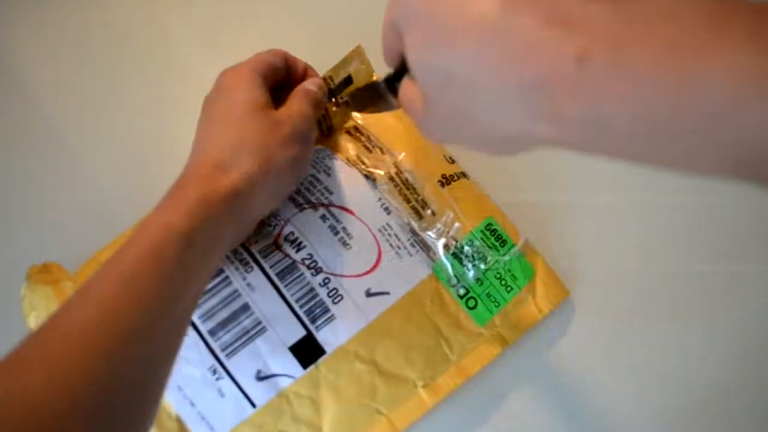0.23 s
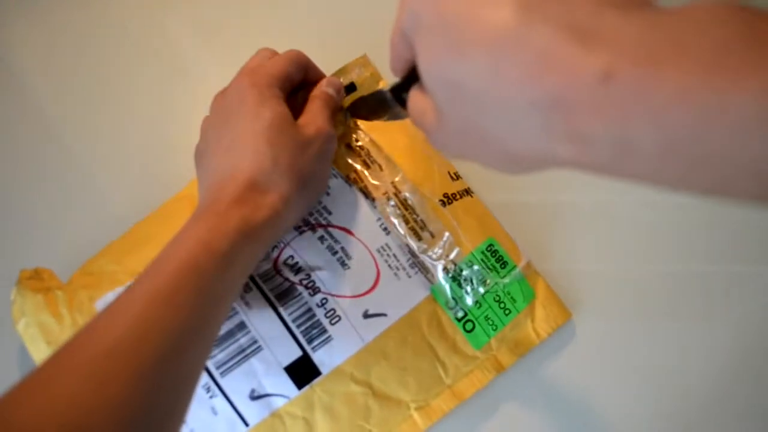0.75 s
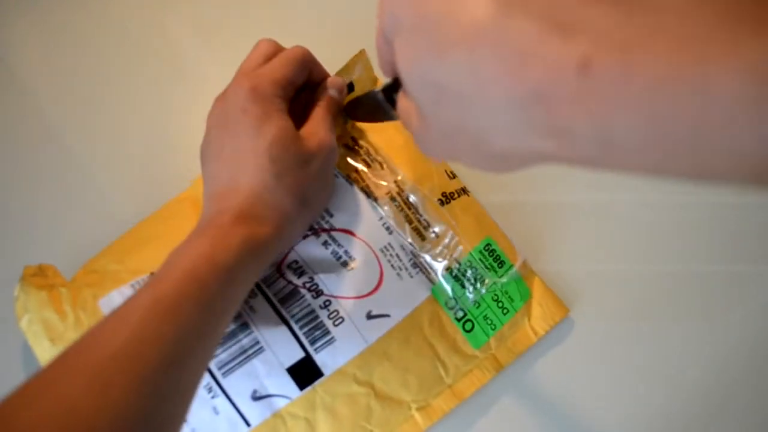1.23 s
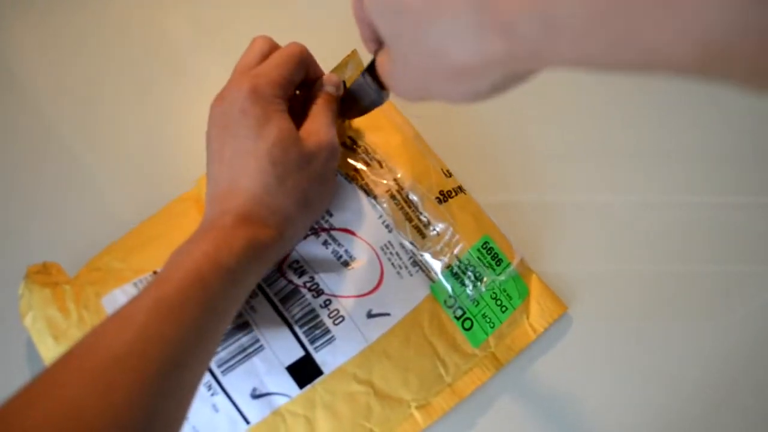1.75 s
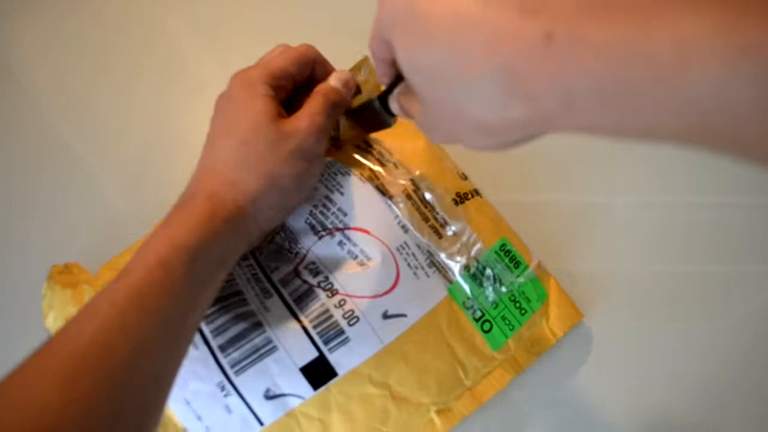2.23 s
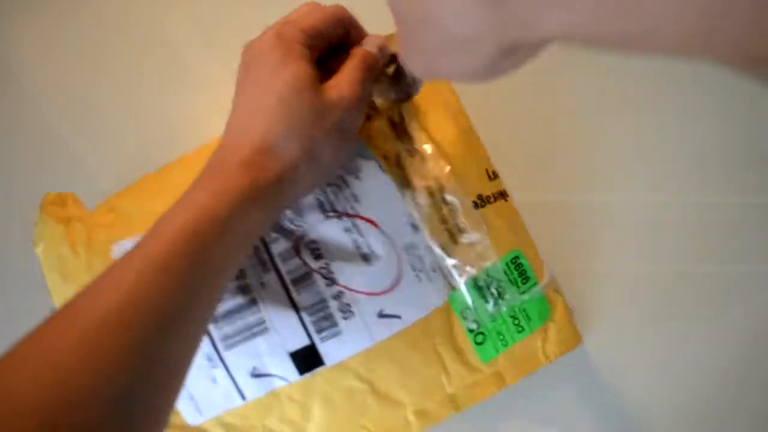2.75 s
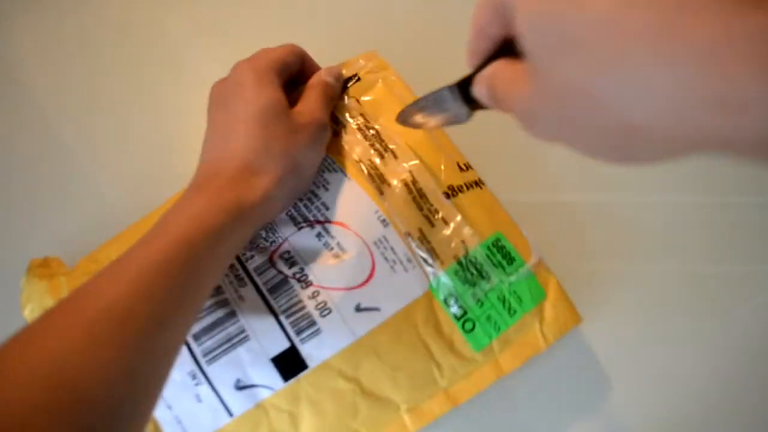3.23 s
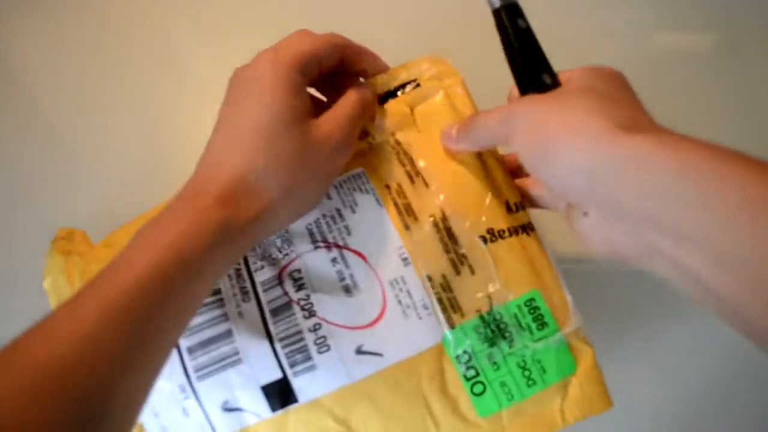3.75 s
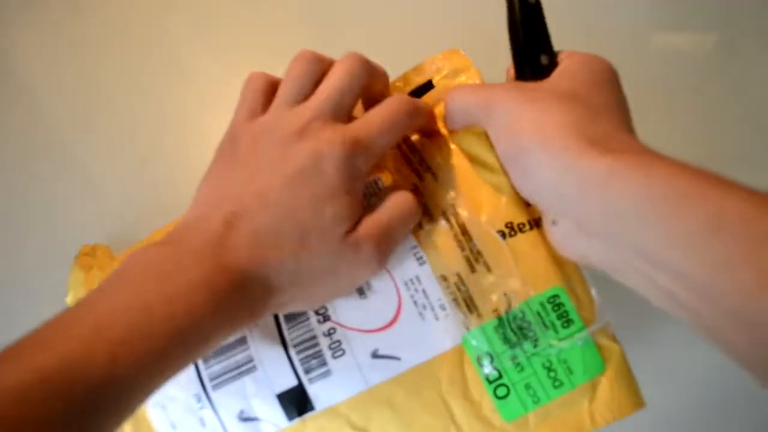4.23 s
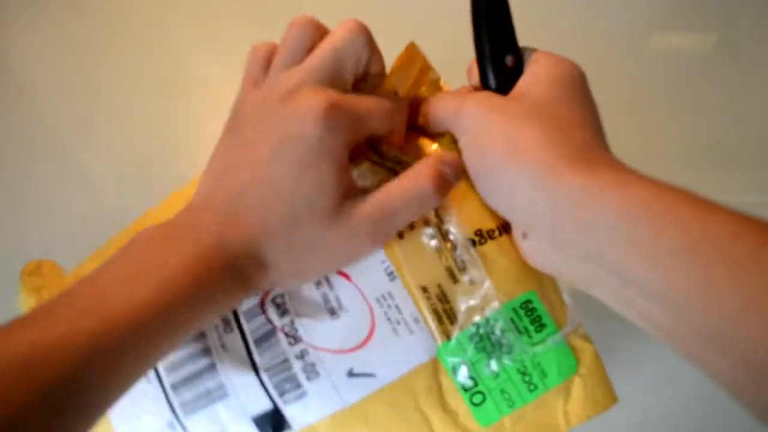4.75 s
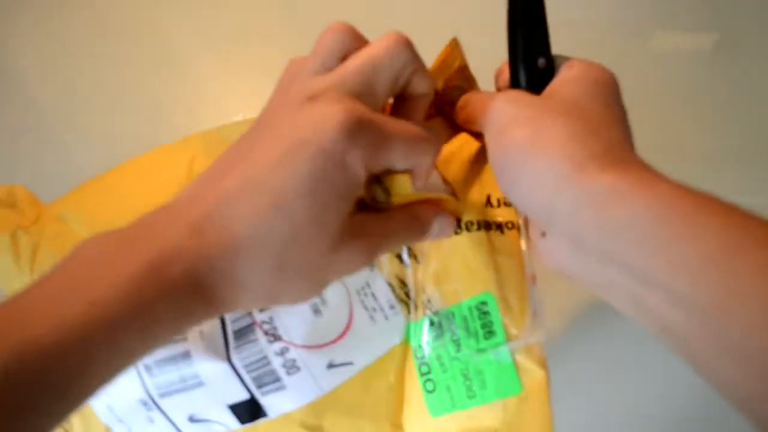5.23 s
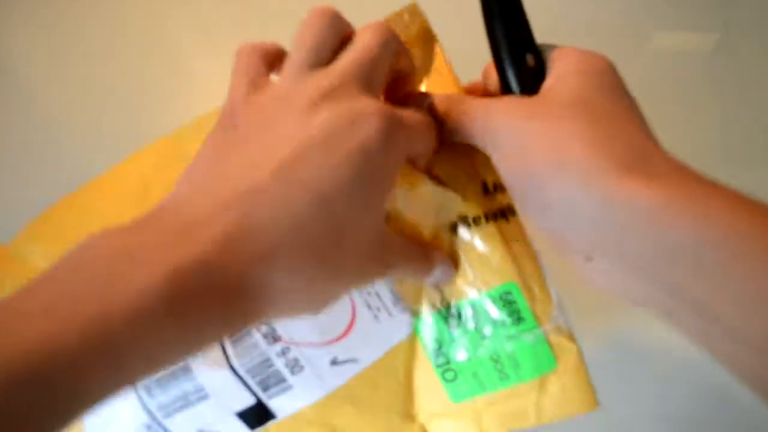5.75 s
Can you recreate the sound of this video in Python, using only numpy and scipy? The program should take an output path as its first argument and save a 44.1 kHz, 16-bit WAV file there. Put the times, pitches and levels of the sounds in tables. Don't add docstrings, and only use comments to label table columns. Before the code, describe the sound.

Irregular crisp creases snap over thin, grainy crinkle as a mailer is cut and pulled open. It begins with a brief flurry, falls to near quiet, picks up with isolated cracks and soft padded flaps, then builds to thick crackling with two strong peaks and low hollow knocks. Mono, close microphone, slightly dull top end, small room with little reverberation and a low noise floor.

```python
import sys
import numpy as np
from scipy import signal
from scipy.fft import rfft, irfft
from scipy.io import wavfile
from scipy.ndimage import uniform_filter1d

SR = 44100
rng = np.random.default_rng(int(sys.argv[2]) if len(sys.argv) > 2 else 0)


def materialize(psi):
    bounded = np.clip(np.atleast_2d(psi).T, -1, 1)
    quanta = np.round(bounded * 32767).astype(np.int16)
    wavfile.write(sys.argv[1], SR, quanta)


def voltage_ratio(level):
    return 10 ** (np.asarray(level, float) / 20)


N = 264203


def evened(x):
    return x / np.sqrt(np.mean(x ** 2) + 1e-20)


def read(points, hz):
    f, value = np.transpose(points)
    return np.interp(np.log(hz + 1), np.log(f + 1), value)


def add(mix, s, sound):
    part = mix[round(s * SR):][:len(sound)]
    part += sound[:len(part)]


def causal(gain_db):
    log_gain = np.log(voltage_ratio(np.maximum(gain_db, -100)))
    whole = np.concatenate([log_gain, log_gain[-2:0:-1]])
    return np.exp(log_gain - 1j * signal.hilbert(whole).imag[:len(log_gain)])


def rattle(chance, fade_s):
    t = np.arange(chance.shape[1]) / SR
    lumps = voltage_ratio(2.5 * evened(uniform_filter1d(chance[1], 30)))
    gap = 1 - np.exp(-(t / 0.0015) ** 2)
    return chance[0] * lumps * np.exp(-t / fade_s) * gap


def snap(ring_hz, paper_db, tick_share, luck):
    hz = np.fft.rfftfreq(4096, 1 / SR)
    octaves = np.log2(ring_hz / 3000)
    film_db = 4.5 + 4.5 * octaves
    rattle_db = -9 - octaves
    colour_db = read([(100, paper_db - 62), (500, paper_db - 22.5), (1500, paper_db), (3700, 0.008),
                      (7500, film_db), (20000, film_db - 4)], hz)
    ring = 1 / (1 + ((hz - ring_hz) / (0.13 * ring_hz)) ** 2)

    tick_db = colour_db + 11 * ring - 5 * np.log2(1 + (hz / (3 * ring_hz)) ** 2)
    tick = irfft(causal(tick_db))[:2048]
    tick *= 1 - np.exp(-5 * ring_hz * np.arange(1, 2049) / SR)

    dull = causal(colour_db + 5.3 * ring - 8 * np.log2(hz / 1000 + 1))
    shaking = rattle(luck, 0.0043 * voltage_ratio(-1.2 * octaves))
    after = irfft(rfft(shaking, 4096) * dull)[:2048] / np.linalg.norm(irfft(dull))
    return tick_share * tick / abs(tick).max() + voltage_ratio(rattle_db) * after


CLEAR_SNAPS = [(0.032, -34.5, 1500, -6), (0.2597, -23.5, 2540, -8.5), (0.299, -31, 4200, -9),
               (0.354, -37, 1840, -6), (0.483, -12, 5070, -5), (0.4857, -7, 5800, 3),
               (0.5083, -19, 5700, -14), (0.5133, -8, 5400, 8.5), (0.5546, -10, 4350, 6.5),
               (0.558, -7, 3800, -1), (0.592, -16.5, 6160, 6), (0.685, -20, 8500, -9),
               (.7111, -27, 5400, -12), (0.7951, -37, 3000, 5), (.887, -22.5, 2820, 14),
               (0.9675, -28, 4050, 4), (1.0064, -31, 2200, -5), (1.0219, -29, 1350, -1),
               (1.0437, -21, 1350, -4.5), (1.0932, -30.5, 1250, -11), (1.2268, -29.5, 3060, 1.5),
               (1.2396, -36, 6360, -6), (1.3763, -34, 1940, -10), (1.502, -37, 6000, -4),
               (1.514, -29.5, 3970, -23), (1.5837, -28, 6060, -13), (1.606, -35, 4110, -13),
               (1.773, -39, 1170, -1), (1.9046, -34, 3180, 1),
               (2.0386, -35, 4000, 12), (2.1034, -21, 4230, -4), (2.2605, -8.5, 7560, -1),
                (2.438, -23, 5800, 4), (2.4453, -30.5, 1160, 4), (2.493, -26, 1540, -5),
                (2.506, -23.5, 9400, -19), (2.6065, -7.5, 4100, -19), (2.6116, -16, 1500, -11),
                (2.6078, -7, 6000, 10), (2.6702, -28, 1600, -10), (2.776, -36, 1750, -5),
                (2.898, -19, 5900, 8), (2.9321, -14, 1910, -7), (3.1913, -23, 1050, 16),
                (3.247, -14, 5700, -19), (3.4233, -19, 6060, 4), (3.47, -27, 5250, 3),
                (3.4755, -23.5, 5630, 2), (3.4845, -27, 6000, 6), (3.5117, -18, 1340, -6),
                (3.5494, -19.5, 5170, -7), (3.5762, -15.5, 5340, -3), (3.6655, -27.5, 4500, 9),
                (3.6917, -33.5, 3900, 9),
               (3.7687, -30, 1450, 8), (3.7887, -33.5, 1060, 14), (3.9298, -19.5, 2400, -8),
                 (3.9354, -18, 4120, 1), (3.967, -29, 1000, -1), (3.989, -24.5, 2910, -30),
                 (3.996, -24.5, 1990, -11), (4.014, -23, 4100, -28), (4.033, -25, 3000, -10),
                 (4.029, -20, 4670, -15), (4.04, -25.5, 2800, -4), (4.0905, -25.5, 3520, -9),
                 (4.1234, -26.5, 4300, 5), (4.1476, -32, 830, 20), (4.292, -16.5, 5130, -4),
                 (4.37, -19.5, 6700, 2), (4.3919, -6.5, 3100, -7), (4.437, -18, 7000, -18),
                 (4.4406, -11.5, 5800, 3), (4.513, -25, 6460, -5), (4.516, -18, 1490, -3),
                 (4.5484, -9.5, 9600, 2), (4.5953, -23.5, 1490, 6), (4.65, -15, 1920, -5),
                 (4.6659, -7, 1500, -5), (4.6858, -19, 3700, -9), (4.7049, -13.5, 7000, 10),
                 (4.7192, -19, 6060, 13), (4.7354, -12, 2730, 7), (4.7451, 1.5, 3860, -3),
                 (4.756, -8, 3740, -1), (4.7734, -18.5, 3080, -1),
               (4.917, -16, 3770, -6), (4.969, -20, 1370, 17), (4.9841, -18.5, 880, 18),
                 (5.007, -19, 3160, -18), (5.1244, -27.5, 1510, -2), (5.1496, -20.5, 1340, 2),
                 (5.1591, -23, 1620, 0.5), (5.184, -17, 6140, 12), (5.1965, 2.5, 4450, -0.5),
                 (5.216, -27, 5120, -4), (5.224, -18, 1800, 1), (5.295, -12.5, 5210, 9),
                 (5.319, -6.5, 1870, -4.5), (5.3567, -8.5, 1320, -3.5), (5.3629, -7.5, 4300, 4),
                 (5.3726, -3, 5700, 5.5), (5.38, -8.5, 7500, 4), (5.3906, -12.5, 1020, -2),
                 (5.4885, -23.5, 1350, 27), (5.5506, -16.5, 5100, 5), (5.6089, -19, 4460, 4),
                 (5.72, -32, 2740, 21), (5.8073, -34, 1760, 2), (5.8486, -11.5, 1440, 0),
                 (5.884, -29, 1330, 2), (5.9186, -9, 1200, 2.5), (5.9443, -14.5, 8400, 10)]
# (time [s], peak level [dB],
# tick pitch [Hz], paper share [dB])
LONE_TICKS = [(0.206, -35, 3790, -7), (0.1105, -35, 5000, -8), (0.3055, -35.5, 2260, -2),
              (0.0005, -32.5, 3500, 5), (0.506, -25, 5700, 0), (0.7545, -36, 5500, -3),
              (0.8304, -33, 2280, -19), (0.903, -39, 5640, 5), (0.9533, -38, 4180, -5),
              (1.0436, -37, 1400, -12), (1.0593, -32, 4470, -2), (1.159, -42, 4130, -4),
              (1.1764, -42, 2410, -10), (1.1854, -38, 5600, -1), (1.196, -38, 4260, -4),
              (1.2061, -43, 3160, 0), (1.5066, -40, 4350, -9), (1.5526, -52, 3320, -4),
              (1.5766, -46, 3830, -1), (1.5987, -39, 4220, -8),
              (1.896, -42, 4220, -7), (1.918, -46, 1110, 5), (2.056, -30.5, 2370, -22),
              (2.0972, -28, 9150, -10), (2.1926, -42, 780, 0), (2.214, -43, 2930, 6),
              (2.2516, -49, 2540, 11), (2.481, -37, 4250, -9), (2.807, -42, 4010, 4.5),
              (2.875, -40.5, 945, -2), (2.8912, -32, 4480, 10), (3.2442, -26, 5470, 6),
              (3.427, -43, 1400, 12), (3.7398, -53, 4440, -4), (4.1312, -34.5, 1240, 3),
              (4.162, -33, 5810, 0), (4.322, -30, 1360, -7), (4.525, -26, 1470, -3),
              (4.5874, -40, 5120, -1), (4.893, -35, 4480, -4), (4.907, -32, 1520, -1),
              (5.1433, -29, 4200, -4), (5.522, -31, 7500, 3), (5.542, -41, 1310, 1),
              (5.977, -29, 2020, -13),
              (0.284, -34, 3680, -4), (0.3698, -37, 1850, -11), (0.5795, -20.5, 4100, 0),
               (0.784, -39.5, 1190, 8), (0.941, -35, 4090, -6), (1.026, -31, 720, 4),
               (1.3157, -33.5, 4230, 3), (1.6313, -42, 3190, -23), (1.8353, -52, 2160, -1),
               (2.231, -57, 950, 6), (2.2727, -21.5, 3040, 0), (2.3126, -16, 1460, -5.5),
               (2.401, -38, 4350, -6), (2.4576, -40, 2970, 11), (2.574, -41, 3270, -5),
               (2.658, -36, 1330, -4), (2.916, -25, 4120, -4), (3.04, -39, 2540, 4), (3.505, -38, 1400, 18),
               (3.8117, -39.5, 1120, 15), (3.949, -28, 2840, -5), (3.98, -33, 1760, -6),
               (4.4854, -37, 1250, 3), (4.635, -25.5, 8870, 0), (4.7146, -17.5, 1500, -10),
               (4.7227, -24, 1500, -2.5), (4.9512, -37, 1080, -3), (5.0255, -25.5, 2020, -19),
               (5.3127, -19, 1100, 3), (5.357, -9.5, 6450, 0), (5.3846, -21, 1740, 2),
               (5.4649, -34, 870, 22), (5.4814, -25.5, 1350, 2), (5.4945, -32, 1630, 13),
               (5.741, -37, 7000, -5), (5.7516, -44, 3060, -3), (5.772, -37, 1100, 3),
               (5.824, -40, 1380, 7), (5.936, -33, 1210, 4)]
SCRUNCHES = [(0.46, -22, 6330, 0), (0.667, -11.5, 8600, -21), (0.684, -14, 2730, -7.5),
             (1.317, -24.5, 4200, -1), (1.4438, -20.5, 1830, 3.5), (1.637, -15.5, 2760, -3.5),
             (1.649, -37, 2750, -7), (0.545, -17, 1290, 8), (.653, -29, 1300, 14), (4.458, -15, 9400, -5),
             (3.2, -17, 5500, -3), (2.58, -19, 5850, -2), (2.594, -16, 7300, -9), (2.9135, -16.5, 1590, 0),
             (2.97, -12, 9200, -6), (3.18, -23, 4480, -4), (3.216, -10.5, 9500, -8), (5.483, -30, 1470, 16)]


def snaps():
    clear = CLEAR_SNAPS
    lone = LONE_TICKS
    out = np.zeros(N)
    for creases, tick_share in [(clear, 1.3), (lone, 2.0), (SCRUNCHES, 0.07)]:
        for s, peak_db, ring_hz, paper_db in creases:
            luck = rng.standard_normal((2, 2048))
            add(out, s, voltage_ratio(peak_db) * snap(ring_hz, paper_db, tick_share, luck))
    return signal.sosfilt(signal.butter(3, 330, "highpass", fs=SR, output="sos"), out)


# (time [s], crinkle level [dB], film brightness [dB])
GRIP = [(0, -46.5, -4), (.2, -46, -3), (.44, -54, -4.5), (.75, -49, 2), (1.261, -53.5, -4),
        (1.34, -47.5, 3.5), (1.8, -57.5, -4), (2.11, -45, -1.5), (2.501, -47, -7.5), (2.85, -53, -6),
        (3.4, -47, -10), (3.59, -47.5, -2.5), (3.75, -56.5, -28), (3.8, -54.5, -4), (4.35, -45.5, 0.5),
        (4.6, -39.5, -5), (4.87, -47, 0), (5.99, -40.5, -4)]
# (start [s], hold
# [s], crinkle level [dB], film brightness [dB])
STROKES = [(0, 0.0021, -37.5, -2.5), (0.489, 0.055, -38.5, 0), (0.547, 0.021, -38.5, -7),
           (0.658, 0.016, -39.5, -2.5), (0.843, 0.075, -44.5, -2), (1.028, 0.026, -45, -9),
           (1.644, 0.015, -51, -6), (2.071, 0.065, -45, -5.5), (2.274, 0.04, -24, -3.5),
           (2.602, 0.038, -37, 1.5), (2.904, 0.098, -40, -1), (2.995, 0.11, -45.5, -9),
           (3.202, 0.023, -37, 0), (3.288, 0.025, -31, -0.5), (3.941, 0.11, -47.5, 9),
           (4.043, 0.016, -39, -5), (4.218, 0.0097, -38, -4.5), (4.115, 0.065, -40, -2),
           (4.366, 0.036, -44.5, 4), (4.44, 0.0043, -32.5, -2.5), (4.511, 0.056, -35.5, -4.5),
           (4.692, 0.037, -32.5, 3.5), (4.974, 0.013, -31.5, -1.5), (5.086, 0.095, -38, -11),
           (5.199, 0.01, -28.5, 12), (5.296, 0.069, -25.5, -4), (5.487, 0.0055, -31.5, -5.5),
           (5.524, 0.011, -31, -4.5), (5.63, 0.02, -34, -8.5), (5.807, 0.09, -37.5, -5),
           (5.921, 0.033, -35, 1.5),
           (0.172, 0.023, -45, -2.5), (1.295, 0.054, -54, 2), (1.951, 0.031, -53, 7),
                 (2.492, 0.015, -47.5, 1), (2.327, 0.018, -33, -15), (2.662, 0.062, -48.5, -0.5),
                 (3.142, 0.052, -45, 8), (3.269, 0.01, -39.5, -8), (3.308, 0.0081, -38, -21),
                 (2.874, 0.026, -46, 1), (1.868, 0.028, -53.5, -3), (3.463, 0.036, -46.5, 8),
                 (3.783, 0.01, -47.5, 7), (3.834, 0.019, -38, -9), (3.886, 0.027, -39.5, -11),
                 (0.578, 0.011, -38, 6), (4.615, 0.048, -37, -6), (4.785, 0.033, -39.5, 0),
                 (5.02, 0.035, -41.5, -9), (5.24, 0.049, -30, -0.5), (5.407, 0.027, -50, -20),
                 (5.715, .03, -44, -10)]


def handling(t):
    rise_db_per_s, fall_db_per_s = 603, 226
    s, grip_db, grip_film_db = np.transpose(GRIP)
    power = voltage_ratio(2 * np.interp(t, s, grip_db))
    bright = power * np.interp(t, s, grip_film_db)
    for start, hold, stroke_db, film_db in STROKES:
        rise_db = rise_db_per_s * np.maximum(start - t, 0)
        fall_db = fall_db_per_s * np.maximum(t - start - hold, 0)
        stroke = voltage_ratio(2 * (stroke_db - rise_db - fall_db))
        power = power + stroke
        bright = bright + stroke * film_db
    return 10 * np.log10(power), bright / power


def steadied(x, size):
    return x / np.sqrt(abs(uniform_filter1d(x ** 2, size)) + 1e-12)


# (frequency [Hz], density [dB per Hz])
SHEET_COLOUR = [(59, -63), (100, -21.5), (555, -1), (758, -1), (1590, 3), (2250, 1), (4460, -5),
                (11300, -10), (13600, -134), (22000, -120)]


def crinkle():
    t, hz = np.arange(N) / SR, np.fft.rfftfreq(2048, 1 / SR)
    effort_db, film_db = (np.interp(t, t[::64], curve) for curve in handling(t[::64]))

    clumps = voltage_ratio(5 * evened(uniform_filter1d(rng.standard_normal(N), 300)))
    per_second = 1500 * voltage_ratio(0.6 * (effort_db + 50)) * clumps
    spread_db = 3.7 - 0.03 * (effort_db + 50)
    size = voltage_ratio(spread_db * np.minimum(rng.exponential(1, N), 3.2))
    size *= rng.random(N) < per_second / SR

    kind = rng.integers(0, 24, N)
    layers = np.zeros((2, N))
    for k, centre_hz in enumerate(np.geomspace(350, 10500, num=24)):
        patch_db = -11 * np.log2((hz + 1) / centre_hz) ** 2
        drive = voltage_ratio(-13) * rattle(rng.standard_normal((2, 1024)), 0.004) + signal.unit_impulse(1024)
        grain = irfft(rfft(drive, 2048) * causal(read(SHEET_COLOUR, hz) + patch_db))[:1024]
        layers[int(centre_hz > 4200)] += signal.oaconvolve(size * (kind == k), grain)[:N]
    paper, film = steadied(layers[0], size=2600), steadied(layers[1], size=2600)
    return voltage_ratio(effort_db - 5) * (paper + voltage_ratio(film_db + 1) * film)


# (frequency [Hz], width [Hz], level
# [dB])
BODY_RESONANCES = [(666, 22, 5), (880, 46, 2.5), (1500, 25, -4.5), (1960, 100, 3), (3850, 320, 2),
                   (4300, 210, 1.5)]


def body(x):
    hz = np.fft.rfftfreq(N, 1 / SR)
    gain_db = sum(db / (1 + (2 * (hz - f) / width) ** 2) for f, width, db in BODY_RESONANCES)
    return irfft(rfft(x) * voltage_ratio(gain_db), N)


# (time [s], peak level [dB], pitch [Hz])
FLAPS = [(0.182, -37.5, 322), (0.48, -46, 362), (0.555, -56, 328), (2.274, -49, 390), (2.293, -38, 437),
         (2.313, -27, 450), (2.444, -37, 434), (2.604, -26, 400), (3.192, -51, 483), (3.768, -38, 447),
         (3.964, -40, 450), (4.448, -43, 445), (4.501, -47, 473), (4.587, -29, 467), (4.635, -41, 400),
         (4.661, -33, 494), (4.742, -32, 327), (4.97, -29.5, 470), (5.141, -46, 403), (5.195, -18, 554),
         (5.266, -36, 484), (5.311, -23, 445), (5.359, -29, 433), (5.384, -20, 387), (5.486, -26, 366),
         (5.653, -43, 383), (5.761, -30, 454), (5.797, -34.5, 457), (5.846, -31, 456), (5.914, -36, 420)]
KNOCKS = [(.548, -48, 714), (.886, -32, 725), (1.021, -48, 690), (1.445, -30.5, 794), (1.636, -44, 700),
          (2.605, -22, 664), (4.127, -30.5, 690), (4.511, -34, 695), (4.986, -21.5, 563), (5.308, -28, 760),
          (5.392, -21, 850), (5.487, -20.5, 680), (5.544, -24, 643)]


def flaps():
    rise_s, fade_s = 0.0034, 0.0045
    out, t = np.zeros(N), np.arange(3000) / SR
    swell = (1 - np.exp(-t / rise_s)) * np.exp(-t / fade_s) * 2
    for s, peak_db, ring_hz in FLAPS + KNOCKS:
        a, b = rng.random(2)
        ring = np.sin(2 * np.pi * (ring_hz * t + a))
        partner = 0.24 * np.sin(2 * np.pi * (0.613 * ring_hz * t + b))
        add(out, s, voltage_ratio(peak_db - 5.5) * (ring + partner) * swell)
    return out


# (frequency [Hz], level [dB], t60 [s])
BLADE_MODES = [(1250, 0, .04), (2740, 3, .13), (3050, -9, .13), (3700, 2, .05), (3850, -4, .06)]


def blade():
    out, t = np.zeros(N), np.arange(8000) / SR
    waver = 0.7 + 0.65 * evened(uniform_filter1d(rng.standard_normal((len(BLADE_MODES), len(t))), 130))
    ring = np.zeros(len(t))
    for chatter, (f, db, t60) in zip(waver, BLADE_MODES):
        ring += chatter * voltage_ratio(db - 60 * t / t60) * np.sin(2 * np.pi * f * t)
    onset = np.sin(np.pi / 2 * np.minimum(t / 0.003, 1)) ** 2
    add(out, 1.6365, voltage_ratio(-34) * ring * onset)
    return out


def squeak():
    start_s, length_s, pitch_hz, level_db = 3.0, 0.09, 2540, -51
    out, t = np.zeros(N), np.arange(0, length_s, 1 / SR)
    a, b = evened(uniform_filter1d(rng.standard_normal((2, len(t))), 180))
    turn = 2 * np.pi * pitch_hz * t
    swell = np.sin(np.pi * (t / length_s) ** 0.6)
    add(out, start_s, voltage_ratio(level_db) * swell * ((1 + a) * np.sin(turn) + b * np.cos(turn)))
    return out


def table():
    rumble_hz = 110
    t = np.arange(0, N + 64, 64) / SR
    effort_db = np.interp(np.arange(N) / SR, t, handling(t)[0])
    band = signal.butter(3, [rumble_hz / 2, rumble_hz * 2], "bandpass", fs=SR, output="sos")
    low = signal.sosfilt(band, rng.standard_normal(N))
    return voltage_ratio(-73.5 + 0.86 * (np.minimum(effort_db, -36) + 38)) * evened(low)


# (frequency [Hz], t60 [s])
ROOM_DECAY = [(300, 0.42), (2100, 0.29), (11000, 0.21)]


def room(x):
    taps = np.zeros(SR // 2)
    at = np.arange(300, len(taps) - 20, 20)
    taps[at + rng.integers(0, 20, len(at))] = rng.choice([-1., 1.], len(at))
    hz, t, z = signal.stft(taps, SR, nperseg=256)
    tail = signal.istft(z * voltage_ratio(-60 * t / read(ROOM_DECAY, hz)[:, None]), SR, nperseg=256)[1]
    return signal.oaconvolve(x, tail / np.linalg.norm(tail))[:N]


# (frequency [Hz], density [dB per Hz])
AIR_COLOUR = [(15, -77), (25, -16), (95, -18), (120, -1.5), (150, -6.5), (330, 1), (1030, -9), (3700, -8),
              (7900, -13), (11300, -17), (13000, -64)]


def air():
    hz = np.fft.rfftfreq(N, 1 / SR)
    return voltage_ratio(-60.5) * evened(irfft(rfft(rng.standard_normal(N)) * voltage_ratio(read(AIR_COLOUR, hz)), N))


def scene():
    sheet = body(snaps() + crinkle()) + flaps() + blade()
    return (sheet + voltage_ratio(-15.5) * room(sheet) + air() + table() + squeak())[None]


# (time [s], low thump level [dB], top-band level [dB], length [s])
OVERLOADS = [
    (.1915, -75, -64, .001),
    (4.7456, -47, -77, .001),
    (5.1971, -41.5, -29, .017),
]


def splash():
    push_s = 0.012
    out, t = np.zeros(N), np.arange(2000) / SR
    top = signal.butter(8, [11500, 16000], "bandpass", fs=SR, output="sos")
    push = np.sin(np.pi * np.minimum(t / push_s, 1)) ** 2
    for s, thump_db, top_db, length in OVERLOADS:
        burst = np.exp(-t / 0.008) * (t < length) + 7 * np.exp(-t / 0.0006)
        fizz = signal.sosfilt(top, rng.standard_normal(len(t)) * burst)
        add(out, s, voltage_ratio(top_db) * fizz)
        add(out, s - push_s / 1.7, -voltage_ratio(thump_db) * push)
    return out


def band_limit(x):
    return signal.sosfilt(signal.butter(12, 16230, fs=SR, output="sos"), x)


def record(dry):
    hz = np.fft.rfftfreq(N, 1 / SR)
    shaved = dry / (1 + (dry / 0.8) ** 8) ** (1 / 8) - dry
    kneed = dry + signal.sosfilt(signal.butter(2, 300, "highpass", fs=SR, output="sos"), shaved)

    notch_db = -6 / (1 + ((hz - 7950) / 350) ** 2)
    sag_db = -10 * np.clip((hz - 10370) / 500, 0, 1)
    edge_db = -np.clip((hz - 11310) / 17, 0, 36) - np.maximum(hz - 12000, 0) / 120
    bass_db = -np.clip((60 - hz) / 12, 0, 3)
    mix = irfft(rfft(kneed) * voltage_ratio(notch_db + sag_db + edge_db + bass_db), N) + splash()
    return band_limit(mix)


dry = scene()
out = record(dry)
materialize(out)
```